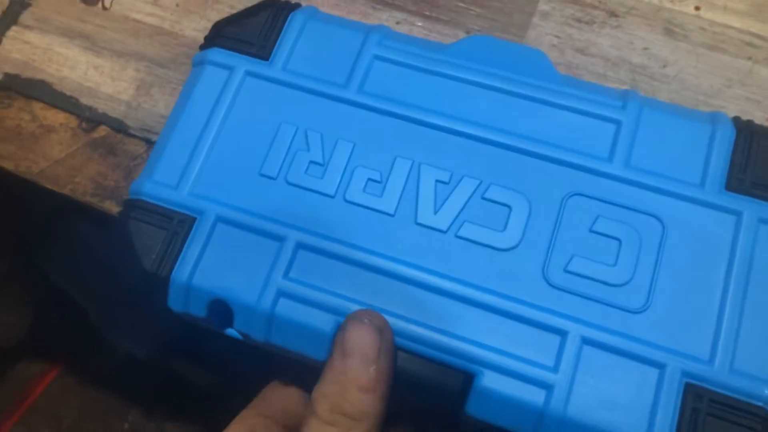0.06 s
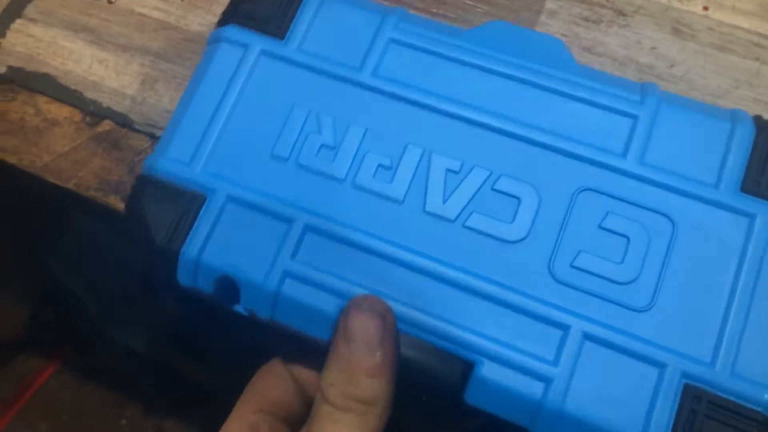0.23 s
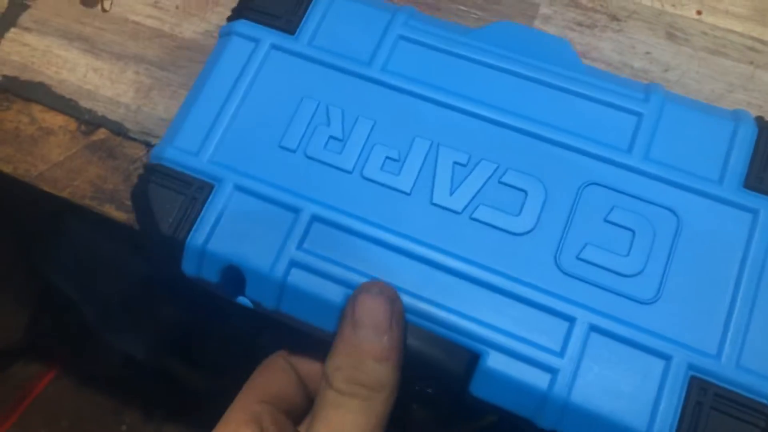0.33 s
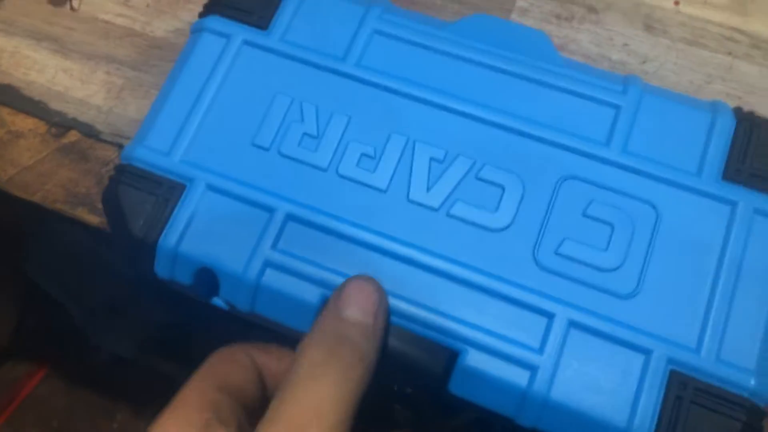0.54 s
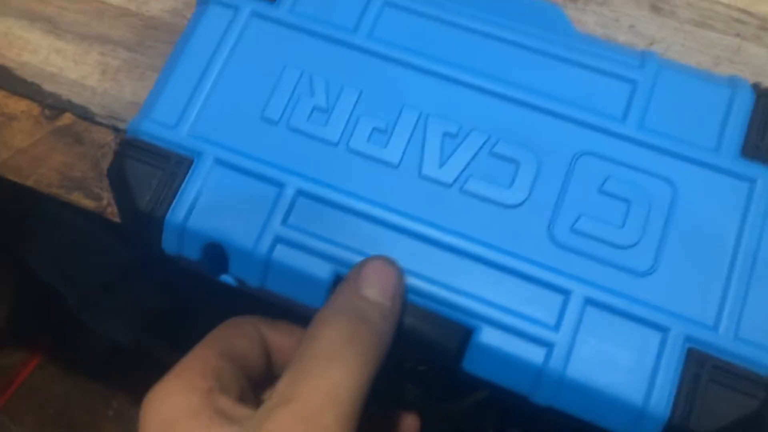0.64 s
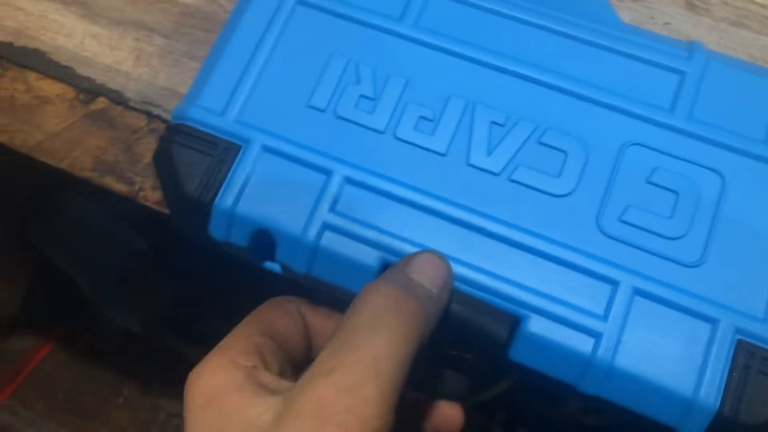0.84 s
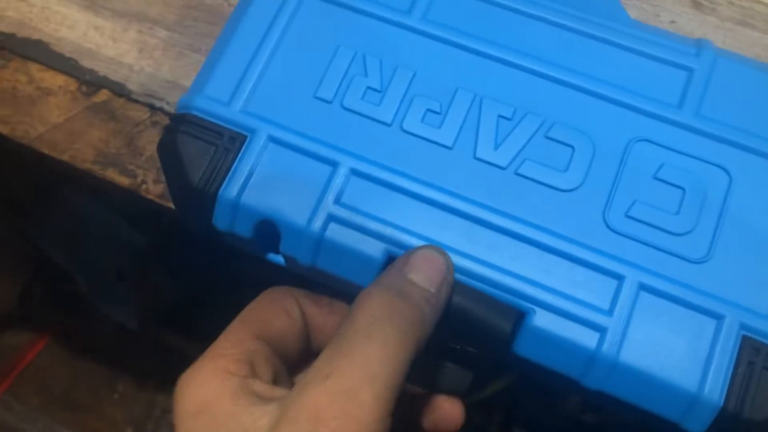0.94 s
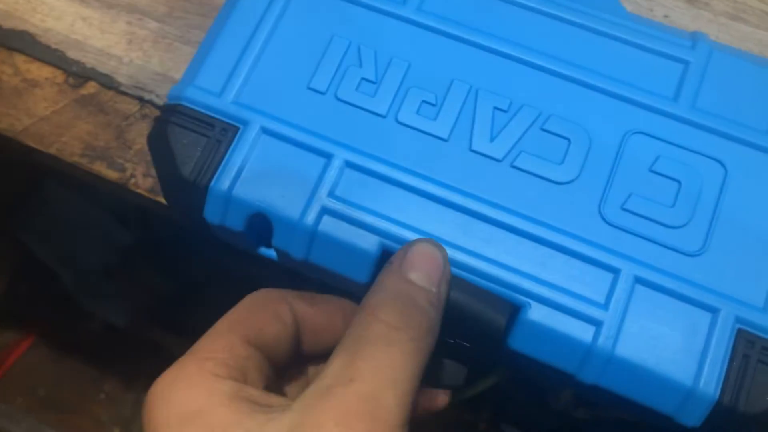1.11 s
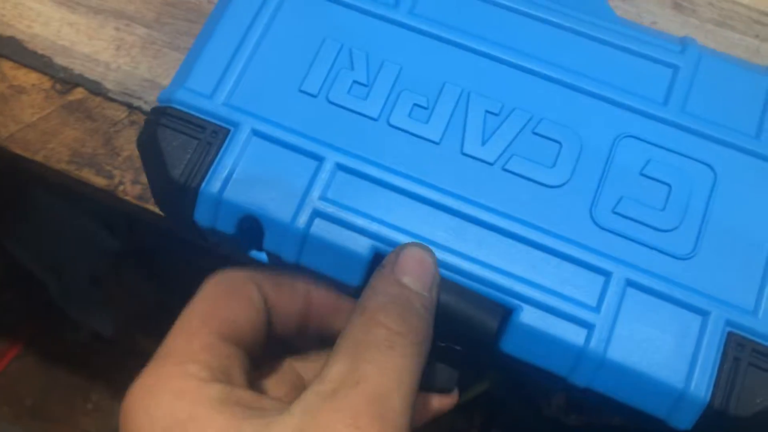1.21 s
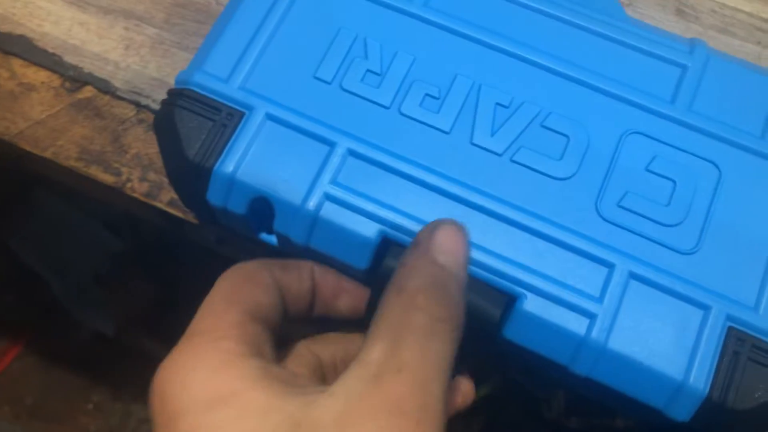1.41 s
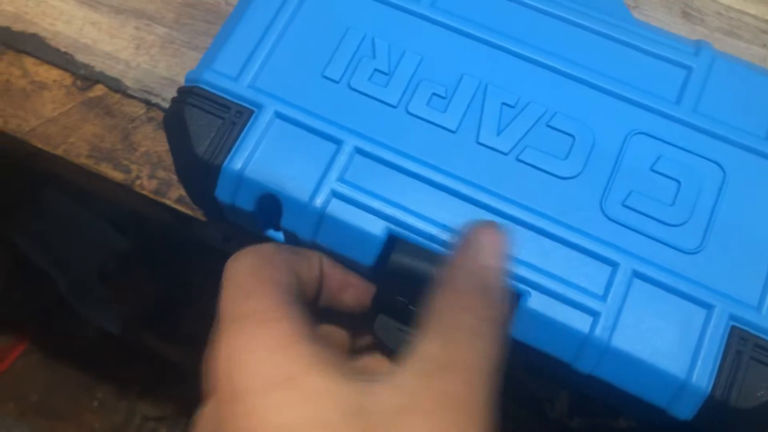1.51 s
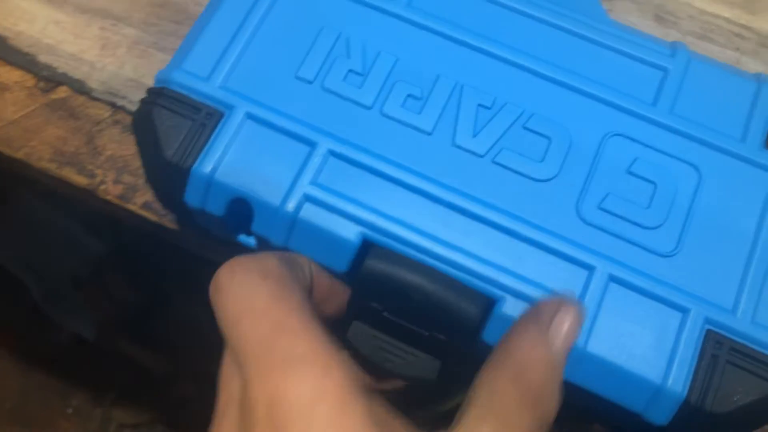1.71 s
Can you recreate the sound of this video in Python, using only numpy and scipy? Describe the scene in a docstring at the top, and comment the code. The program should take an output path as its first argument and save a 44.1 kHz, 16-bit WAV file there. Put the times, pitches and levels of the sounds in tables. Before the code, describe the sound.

A latch snaps on a hard plastic tool case, the hollow shell clattering and rocking on a wooden bench; faint rubs and bumps follow, then a softer hollow tock and bright click, close in a small quiet workshop.

```python
"""A hard plastic tool case on a wooden bench in a small workshop, as a close microphone would hear it.
Over quiet room tone come a faint finger rub, a light bump and a tiny hook click; then a latch snaps over
and the hollow shell clatters and rocks on the bench. Bumps, rubs and a faint hinge drag follow, then the
second latch gives a hollow tock and a light, bright click, and soft rubs close the scene.
Blows are damped modes plus noise cracks; rubs and drags are tiny slips over hiss; room tone is noise."""
import sys
import numpy as np
from scipy import signal
from scipy.fft import rfft, irfft, next_fast_len
from scipy.io import wavfile

SR = 44100
rng = np.random.default_rng(int(sys.argv[2]) if len(sys.argv) > 2 else 0)


def wav_record(signal):
    """Record a signal, one row per channel, as 16-bit PCM in the file named by sys.argv[1]."""
    frames = np.transpose(np.atleast_2d(signal))
    bounded = np.clip(frames, -1, 1)
    # unit amplitude maps onto the largest positive 16-bit level
    quanta = np.round(bounded * 32767).astype(np.int16)
    wavfile.write(sys.argv[1], SR, quanta)


N = 77175
T = np.arange(SR // 2) / SR  # time axis of one blow or room tail, s

# Workshop room tone spectrum: pitch_hz, level_db
ROOM_TONE_SPECTRUM = [(15, -63), (25, -28), (75, -2.5), (116, -6.5), (198, -4), (322, -8.5), (378, -7),
                      (537, -9), (666, -13), (826, -11.5), (1450, -18), (1570, -18.5), (15500, -34)]
# Reverberation of the workshop: pitch_hz, t60_s
ROOM_DECAY = [(80, 0.41), (300, 0.28), (1200, 0.23), (4000, 0.26), (8000, 0.23), (14000, 0.17)]
# Finger strokes along the plastic: start_s, length_s, level_db
FINGER_RUBS = [(-.01, 0.011, -65), (.192, 0.057, -55), (.615, 0.042, -62), (1.165, 0.063, -61.5),
               (1.245, 0.068, -61), (1.455, 0.032, -63), (1.56, 0.084, -69), (1.655, .12, -65)]
# Spectrum of fingers on plastic: pitch_hz, level_db
RUB_SPECTRUM = [(60, -9), (200, 4), (550, 1), (900, -5.5), (1400, -2.5), (2200, -7), (4300, -9),
                (6000, -16.5), (7800, -17.5), (9500, -32), (15000, -32)]
# Bumps of the case on the bench: start_s, level_db
BENCH_BUMPS = [(.078, -57), (.236, -42), (0.278, -36), (0.3012, -33.5), (.319, -37), (0.345, -44),
               (0.372, -58.5), (.482, -57), (0.549, -63), (.636, -53), (.664, -52), (.712, -61.5),
               (1.266, -50), (1.293, -63)]
# Modes of the bench: pitch_hz, level_db, t60_s
BENCH_MODES = [(58.5, -7, 0.29), (84.5, -2, 0.18), (128.8, -4.5, 0.25), (191.7, -1.5, .2),
               (248.6, -3, 0.15), (369.3, -12.5, 0.13)]
# Clicks of the latch hook: start_s, ring_level_db, crack_level_db
HOOK_CLICKS = [(.1955, -63.5, -63), (1.4908, -54.5, -40), (1.4937, -42, -51), (1.5005, -52.5, -48)]
# Modes of the latch hook: pitch_hz, level_db, t60_s
HOOK_MODES = [(227, -9, 0.12), (345, -10, 0.068), (468, -3.5, 0.069), (1120, 8, 0.023), (1244, -0.5, .05),
              (1574, 2.5, 0.062), (2557, -1, 0.032), (3110, -10.5, 0.053), (3476, -4.5, 0.072),
              (4390, -13, .06), (4760, -11, 0.046)]
# Spectrum of the hook's crack: pitch_hz, level_db
HOOK_CRACK_SPECTRUM = [(150, -26), (450, -2.5), (800, -4), (1300, 1.5), (2100, -5.5), (2900, -0.5),
                       (4800, -3.5), (6800, -13), (8500, -31.5), (15000, -39)]
# Contacts of the big snap on the shell: start_s, ring_level_db, crack_level_db
SHELL_KNOCKS = [(.2308, -32, -26.5), (.2372, -32.5, -28), (.2435, -44, -31.5), (.2480, -39.5, -35),
                (.2535, -45, -30), (.2722, -39.5, -48), (.2905, -43.5, -46.5)]
# Modes of the hollow shell: pitch_hz, level_db, t60_s
SHELL_MODES = [(187.6, -2, 0.1), (343, -3.5, 0.082), (564.2, 5, .07), (667, -9, 0.1), (755, -8, 0.082),
               (961, -2, 0.074), (1137, -8.5, 0.14), (1294, 3, 0.073), (1564, -2, 0.031), (1853, 0, 0.038),
               (2445, -12, 0.096), (3146, -12, 0.074), (3830, -17, .08)]
# Spectrum of the shell's crack: pitch_hz, level_db
SHELL_CRACK_SPECTRUM = [(80, -17), (250, 0), (700, -4), (1700, -5), (2300, -9.5), (4200, -12.5),
                        (5500, -22.5), (7000, -22), (9500, -32.5), (15500, -43)]
# Stiff drags of the lever in its hinge: start_s, length_s, level_db
HINGE_DRAGS = [(.915, .015, -71.5), (1.166, 0.044, -55)]
# Spectrum of the dragging hinge: pitch_hz, level_db
HINGE_SPECTRUM = [(150, -15.5), (290, -8), (360, 5.5), (480, -20), (630, 3), (760, -12), (1000, -9.5),
                  (1500, -20.5), (5000, -40)]
# Soft blows on the latch lever: start_s, ring_level_db, crack_level_db
LEVER_TOCKS = [(1.174, -53.5, -54.5), (1.3636, -38, -44.5)]
# Modes of the latch lever: pitch_hz, level_db, t60_s
LEVER_MODES = [(217.6, -12.5, 0.11), (521.3, 1, 0.17), (614, -3, 0.048), (821, -6, 0.075),
               (930, -11, 0.055), (1070, -2.5, 0.039), (1780, -18, 0.063), (2070, -25, .06)]
# Spectrum of the lever's crack: pitch_hz, level_db
LEVER_CRACK_SPECTRUM = [(100, -25), (400, 4.5), (1000, 2), (1600, -8), (4000, -14), (8000, -24),
                        (15000, -45)]

ROOM_TONE_DB = -65.5
WALL_DELAY_S = 0.0069  # first reflection, about 2.4 m of extra path
RUB_RISE_S, RUB_FALL_DB_PER_S = 0.013, 218
SLIPS_PER_S, SLIP_POWER_SHARE = 900, 0.44
TOP_HZ = 15850


def amp(db):
    """Gain of a level in dB."""
    return 10 ** (np.asarray(db) / 20)


def unit(x):
    """Scale x to rms 1."""
    return x / np.sqrt(np.mean(x ** 2) + 1e-20)


def along(points, hz):
    """Read (pitch_hz, value) points on a log pitch axis."""
    point_hz, value = np.transpose(points)
    return np.interp(np.log(hz + 1), np.log(point_hz + 1), value)


def fade(t60, t):
    """Exponential decay, down 60 dB after t60 seconds."""
    return np.exp(-np.log(1000) * t / np.maximum(t60, 1e-4))


def add(track, start_s, sound):
    """Mix a sound into the track at its start time."""
    i = max(round(start_s * SR), 0)
    track[i:i + len(sound)] += sound[:N - i]


def colour(x, spectrum, size=8192):
    """Minimum-phase filter of unit energy with the given spectrum."""
    gain = amp(along(spectrum, np.fft.rfftfreq(size, 1 / SR)))
    cepstrum = irfft(np.log(gain))
    # folding the cepstrum onto positive times makes the filter causal
    cepstrum[1:size // 2] *= 2
    cepstrum[size // 2 + 1:] = 0
    impulse = irfft(np.exp(rfft(cepstrum)))
    return signal.fftconvolve(x, impulse / np.linalg.norm(impulse))[:len(x)]


def in_room(x, wet_db):
    """The direct sound plus the workshop's short, diffuse answer, decaying by pitch."""
    hz, t, z = signal.stft(rng.standard_normal(len(T)), SR, nperseg=256)
    decaying = z * fade(along(ROOM_DECAY, hz)[:, None], t)
    tail = signal.istft(decaying, SR, nperseg=256)[1][:len(T)]
    # silent up to the wall delay, full at twice that delay
    tail *= np.clip(T / WALL_DELAY_S - 1, 0, 1)
    wet = signal.fftconvolve(x, tail / np.linalg.norm(tail))[:len(x)]
    return x + amp(wet_db) * wet


def ring(modes, attack_s, scatter_db):
    """Damped modes, their levels a little different at every blow."""
    tones = np.zeros(len(T))
    for k, (pitch_hz, level_db, t60_s) in enumerate(modes):
        gain = (-1) ** k * amp(level_db + scatter_db * rng.normal())
        tones += gain * fade(t60_s, T) * np.sin(2 * np.pi * pitch_hz * T)
    return tones * (1 - np.exp(-T / attack_s))


def blows(rows, modes, spectrum, crack_t60, attack_s, ring_wet_db, crack_wet_db):
    """Each contact rings the part's main modes and a noise crack of dense, short-lived ones."""
    out = np.zeros(N)
    for start_s, ring_db, crack_db in rows:
        tone = in_room(ring(modes, attack_s, scatter_db=2), ring_wet_db)
        burst = rng.standard_normal(len(T)) * fade(crack_t60, T)
        crack = in_room(colour(burst, spectrum), crack_wet_db)
        add(out, start_s, amp(ring_db) * tone + amp(crack_db) * crack)
    return out


def friction(strokes, spectrum):
    """Tiny slips over a smooth hiss; each stroke rises, holds and dies away."""
    t = np.arange(N) / SR
    level = np.zeros(N)
    for start_s, length_s, level_db in strokes:
        rise = np.clip((t - start_s) / RUB_RISE_S, 0, 1)
        past_end_s = np.maximum(t - start_s - length_s, 0)
        level += rise * amp(level_db - RUB_FALL_DB_PER_S * past_end_s)
    slips = unit((rng.random(N) < SLIPS_PER_S / SR) * rng.standard_normal(N))
    hiss = rng.standard_normal(N)
    grain = np.sqrt(SLIP_POWER_SHARE) * slips + np.sqrt(1 - SLIP_POWER_SHARE) * hiss
    return colour(level * grain, spectrum)


def room_tone():
    """The quiet workshop: steady noise shaped by the room tone spectrum."""
    return amp(ROOM_TONE_DB) * unit(colour(rng.standard_normal(N), ROOM_TONE_SPECTRUM))


def finger_rubs():
    """Fingers slip in tiny steps along the plastic."""
    return friction(FINGER_RUBS, RUB_SPECTRUM)


def bench_bumps():
    """The case rocks on the bench, whose low modes answer in dull, slow-starting bumps."""
    out = np.zeros(N)
    for start_s, level_db in BENCH_BUMPS:
        bump = ring(BENCH_MODES, attack_s=0.0048, scatter_db=1.0)
        add(out, start_s, amp(level_db) * in_room(bump, wet_db=-12.5))
    return out


def hook_clicks():
    """The small latch hook clicks free, ringing light and bright."""
    return blows(HOOK_CLICKS, HOOK_MODES, HOOK_CRACK_SPECTRUM, crack_t60=0.032,
                 attack_s=0.00047, ring_wet_db=-12.5, crack_wet_db=-5.5)


def shell_clatter():
    """The snap makes the two halves of the hollow case clatter."""
    return blows(SHELL_KNOCKS, SHELL_MODES, SHELL_CRACK_SPECTRUM, crack_t60=0.033,
                 attack_s=0.0005, ring_wet_db=-17, crack_wet_db=-5)


def hinge_drags():
    """The lever drags stiffly in its hinge, slipping in tiny steps."""
    return friction(HINGE_DRAGS, HINGE_SPECTRUM)


def lever_tocks():
    """Soft blows set the latch lever ringing in hollow tocks."""
    return blows(LEVER_TOCKS, LEVER_MODES, LEVER_CRACK_SPECTRUM, crack_t60=0.031,
                 attack_s=0.00072, ring_wet_db=-16, crack_wet_db=-1)


def scene():
    """Case, latch and fingers over the quiet room tone, on one microphone channel."""
    tone = room_tone()
    case = shell_clatter() + bench_bumps()
    latch = lever_tocks() + hook_clicks()
    rubbing = finger_rubs() + hinge_drags()
    return (tone + case + latch + rubbing)[None]


def record(dry):
    """The recorder keeps nothing at or above its band limit."""
    m = next_fast_len(N + SR // 2)
    in_band = np.fft.rfftfreq(m, 1 / SR) < TOP_HZ
    return irfft(rfft(dry, m) * in_band, m)[..., :N]


dry = scene()
out = record(dry)
wav_record(out)
```